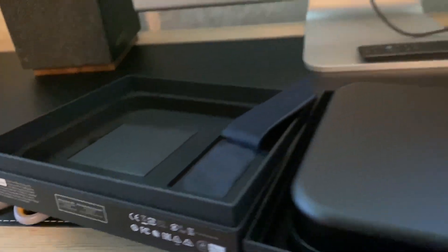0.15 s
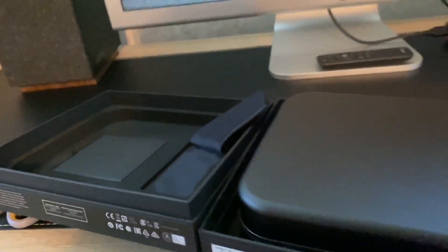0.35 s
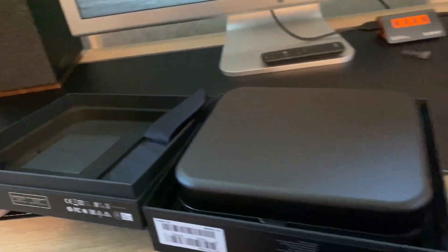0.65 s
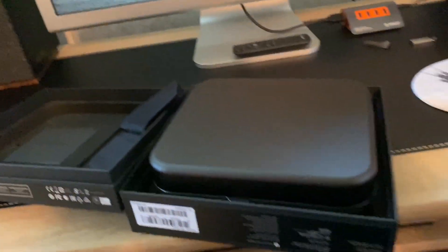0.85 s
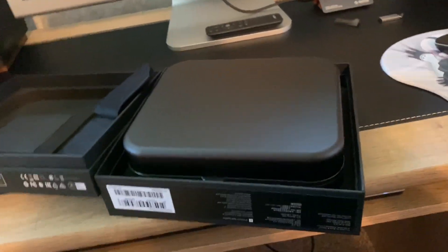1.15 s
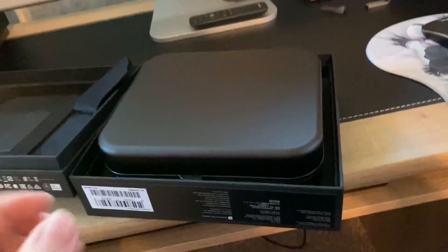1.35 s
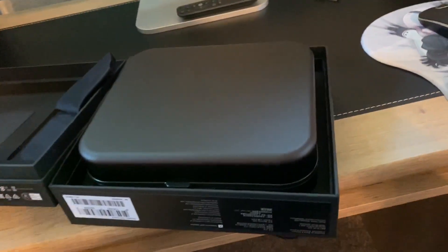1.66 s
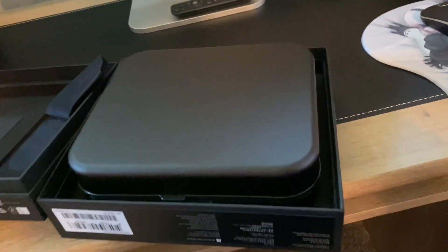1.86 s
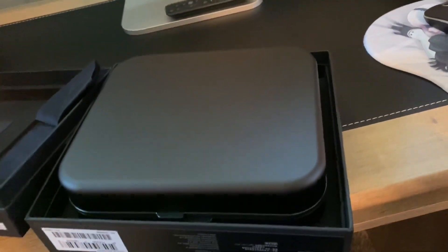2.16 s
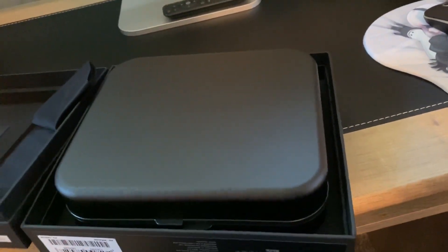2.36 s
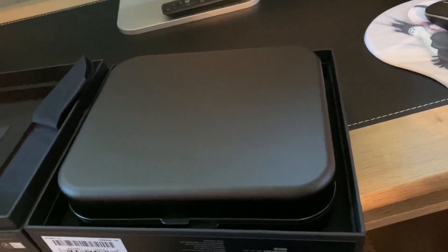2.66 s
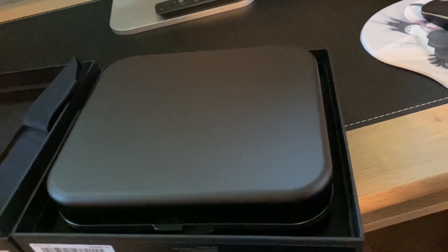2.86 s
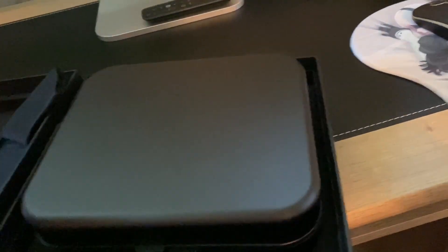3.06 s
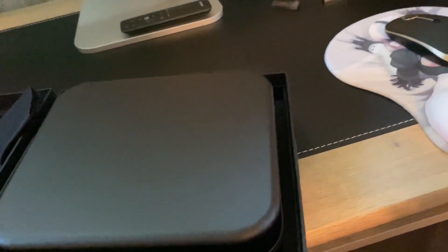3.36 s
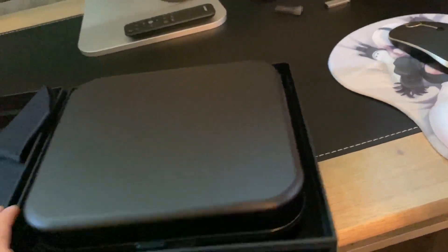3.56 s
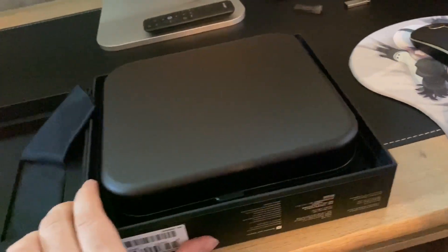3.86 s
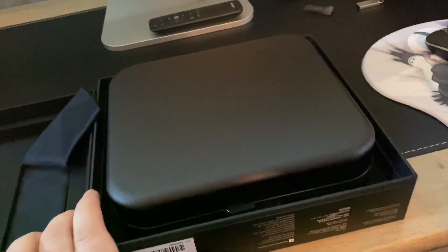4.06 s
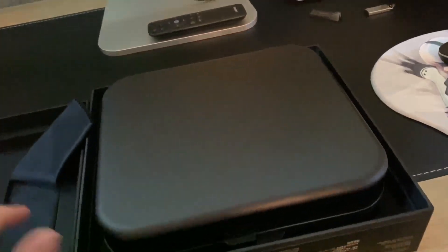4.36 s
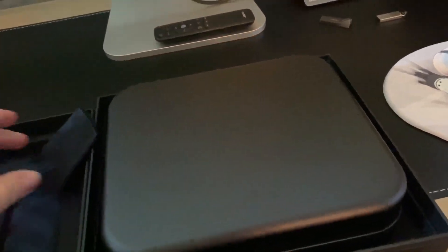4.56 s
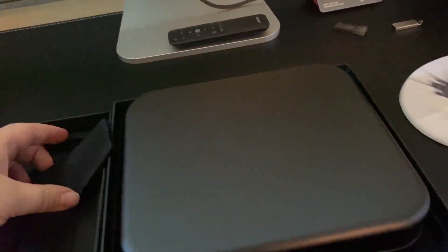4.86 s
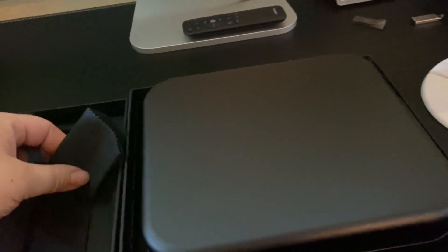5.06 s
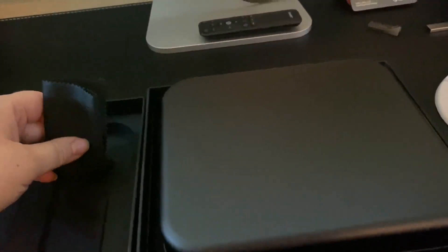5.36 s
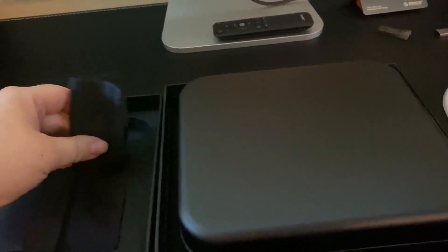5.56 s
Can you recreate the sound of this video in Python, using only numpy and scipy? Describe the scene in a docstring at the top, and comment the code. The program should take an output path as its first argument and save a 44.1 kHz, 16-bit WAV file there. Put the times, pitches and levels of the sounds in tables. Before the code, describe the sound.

Heard very near, with a short dull room tail: first only low humming air, then a small catch and bump at about one second. Cardboard rasps dryly with ticking edges and drops with a muffled knock, bumps softly again, then scrapes briefly and lands hard on the desk in a rapid cluster. Light rustling of fingers on cloth closes the scene.

```python
"""A low ventilation rumble with a wavering hum is heard first: shaped steady noise plus narrow noise bands.
Then a stiff cardboard box is handled on a wooden desk in a quiet room, close to two small microphones.
Fingers, card and cloth slide with a fine rasp (noise through resonances), edges tick as they catch (short
cracks of noise), and the hollow box knocks on the desk (sines that die away). A short room tail follows."""
import sys
import numpy as np
from scipy import signal
from scipy.fft import rfft, irfft, next_fast_len
from scipy.io import wavfile

SR = 44100
rng = np.random.default_rng(int(sys.argv[2]) if len(sys.argv) > 2 else 0)


def master(y):
    """Save y as 16-bit WAV."""
    cut = np.clip(np.atleast_2d(y).T, -1, 1)
    pcm = np.round(cut * 32767)  # scale
    wavfile.write(sys.argv[1], SR, pcm.astype(np.int16))


N = 252235  # length in samples

# Steady room noise, low part and high part: pitch_hz, level_db (per Hz)
RUMBLE_SPECTRUM = [(20, -103), (38, -83.5), (55, -64.5), (100, -69.5), (135, -72), (165, -76.5),
                   (230, -77.5), (300, -84.5), (520, -91.5), (800, -99), (1150, -101.5)]
AIR_SPECTRUM = [(1300, -106), (2000, -112), (3300, -117), (4300, -122.5), (6500, -126), (8500, -126),
                (10500, -131), (13500, -135), (16000, -148)]
# Wavering tones of the room: pitch_hz, width_hz, level_db (rms, before any drift)
HUM_TONES = [(70, 25, -53), (116.64, 3.36, -53), (448.4, 104, -64), (717, 34, -74.5), (867, 320, -69.5)]
DRIFT_DB, DRIFT_PER_S = 1.2, 1.5   # the upper tones swell and sink
UPPER_TONES_FROM_HZ = 202

# Four groups of resonances that colour a slide: pitch_hz, width_hz, level_db (within the group)
RASP_PEAKS = [(2630, 260, -9.5), (3035, 410, -7.5), (4160, 2100, -9)]        # edges and gaps
BODY_PEAKS = [(1120, 920, 9), (2010, 840, 5.5)]        # card panels under the slide
SCRATCH_PEAKS = [(4640, 3200, 5), (6760, 880, 5), (7630, 1180, 6)]  # corners and nails
HISS_PEAKS = [(8550, 2100, -5.5), (10730, 4750, 7), (12500, 7700, 6), (15100, 1700, -1.5)]        # surface grain
# Two long slides of card on card, each a list of points along a curve:
# time_s, rasp_db, then relative to the rasp: body_db, scratch_db, hiss_db
LONG_SLIDES = [
    [(1.5, -104, 15, -10, -15), (1.61, -80.5, 10.5, -14, -22), (1.684, -74, 8.5, -3.5, 5.5),
     (1.836, -73, 1, 1.5, 8), (1.92, -68.5, -6, 6, 14), (2.05, -70, 0, 1, 6.5), (2.15, -74, 5, -2, 8),
     (2.226, -69, -0.5, -3, 11), (2.33, -71, 0, -1.5, 9.5), (2.45, -66.5, -1, -4.5, 0.5),
     (2.51, -65, 1.5, -1, 4), (2.59, -75, -8, 6.5, 11.5), (2.74, -77.5, 1, 8, 5), (2.81, -95, 8, -15, -12)],
    [(3.342, -83, -2, 1, 1), (3.35, -63.5, 1, -2.5, -6.5), (3.526, -59, -1, -2, -4.5),
     (3.782, -63.5, 1, 4.5, 2.5), (3.81, -57.5, 6.5, -1, 1)],
]
# Short rubs of finger, card or cloth, and the shiver after a knock:
# start_s, rise_s, hold_s, rasp_db, then relative to the rasp: body_db, scratch_db, hiss_db
RUBS = [(.315, 0.009, .045, -100, -9, 19.5, 2), (1.054, 0.0025, 0.029, -63.5, 5, -8, -26),
        (1.097, 0.0044, 0.0017, -67.5, 11.5, -9, 2), (1.12, 0.0048, 0.012, -78, -4, -9, 4),
        (1.217, .003, 0.039, -84, -5, -3, -2), (2.515, 0.0013, 0.00099, -63, 12, 7.5, -5),
        (2.833, 0.0016, 0.012, -78, 10, 4, -32), (3.238, 0.037, 0.016, -74.5, 4, 6.5, 15),
        (3.275, 0.0089, 0.019, -67.5, -12, 6.5, -5), (3.805, 0.0068, 0.025, -47, 1, -5, -3.5),
        (3.95, 0.003, 0.051, -75, 2.5, -19, -30), (4.003, 0.0036, 0.057, -74, -4, -2.5, -7.5),
        (4.087, 0.024, 0.0066, -77, 4, -6, 7), (4.183, 0.014, .002, -80, 2, 1, 4),
        (4.41, 0.032, 0.06, -86.5, -18, 1, 1), (4.618, 0.028, 0.036, -74, -10, -5.5, -0.5),
        (4.777, 0.007, 0.068, -63.5, -2.5, -1.5, -3), (4.9, 0.0041, 0.0064, -68.5, 5.5, -2, -5),
        (5.045, 0.011, 0.0016, -85.5, 13, 3, 6.5), (5.215, 0.018, 0.02, -70.5, -4.5, -3.5, 3.5),
        (5.68, 0.0053, .05, -72, 2.5, -5, -8)]
# How fast a rub dies away in rasp, body, scratch and hiss: fade (dB per second)
RUB_FADES_DB_PER_S = [280, 274, 310, 407]

# Scuffs and soft shoves, noise around one pitch: start_s, rise_s, hold_s, level_db, pitch_hz, width_hz
SCUFFS = [(1.055, 0.0025, .015, -56.5, 2550, 990), (1.6, 0.033, 0.17, -78, 4430, 590),
          (1.948, 0.0077, 0.02, -55.5, 600, 585), (3.665, 0.016, 0.042, -52, 370, 376),
          (2.324, 0.026, 0.12, -69, 3270, 590), (3.998, 0.0041, 0.011, -68, 2320, 590),
          (4.083, 0.012, 0.026, -69, 4470, 1200), (4.08, 0.02, 0.025, -73.5, 7100, 800),
          (4.178, 0.011, 0.015, -80, 6900, 590), (4.182, .008, .02, -78, 4600, 900),
          (4.408, 0.033, .04, -81, 3680, 900), (4.63, .012, 0.042, -78, 2900, 600),
          (4.78, .005, 0.079, -73, 2200, 1500), (5.223, 0.0027, 0.026, -65.5, 4000, 2000),
          (5.291, 0.014, 0.018, -82, 4700, 900)]
SCUFF_FADE_DB_PER_S = 395

# Edges catching: start_s, level_db (peak), pitch_hz (main ring), treble_db (relative to ring), fade_ms
TICKS = [(1.1000, -37, 4900, -6, 0.61), (1.1101, -32.5, 3500, -27, 0.97), (1.1263, -41, 2300, -14, 0.87),
         (1.133, -48, 2780, 6, 0.94), (1.217, -57.5, 2750, -25, 2.5), (2.025, -52, 3500, -6, 2.5),
         (2.0556, -43, 2540, 2.5, 2.1), (2.507, -43, 6800, -9, 1.5), (2.512, -40.5, 3670, 3, 2),
         (2.5171, -31.5, 3150, -2, 1.8), (2.834, -46.5, 3060, -30, 2.6), (2.873, -59, 3130, -22, 3),
         (3.2735, -60, 2580, 12, 1.5), (3.3166, -29, 5440, -3, 0.91), (3.352, -41.5, 2440, -12, 2.3),
         (3.449, -42, 9000, -3, 1.0), (3.454, -46, 9900, 1, 1.0), (3.7938, -46, 7670, 2, 1.1),
         (3.8159, -36.5, 4340, 3.5, 5.2), (4.267, -66, 9000, 5, .6), (4.777, -47.5, 4500, 5, 1.5),
         (4.845, -50, 4500, 0, 1.3), (4.905, -65, 2400, -8, 1.2), (4.927, -49.5, 5670, -8, 1.6),
         (5.055, -68, 2600, -3, 1.2), (5.072, -76, 2600, -3, 1.2), (5.216, -59.5, 3000, -12, 1.5),
         (5.229, -50, 4860, -15, 2.7)]
TICK_SCRATCH_DB = -18   # corner scratch in every catch, relative to its ring
# One edge stutters along the rim: start_s, level_db (peak)
STUTTER = [(2.33, -46), (2.351, -42), (2.364, -41.5), (2.3855, -35.5), (2.4066, -48), (2.432, -49),
           (2.444, -45), (2.449, -52), (2.457, -49), (2.463, -46), (2.49, -48)]
# The rings shared by all its ticks: pitch_hz, width_hz, level_db (relative)
STUTTER_RINGS = [(3260, 320, 8), (5270, 530, -0.5), (6900, 1100, -2), (10900, 1500, 3)]
STUTTER_FADE_MS = 2.5

# Modes (natural tones) of box and desk: pitch_hz, level_db (relative), t60_s (time to fall 60 dB,
# before the hand's limit), lean (right -1 to left 1, before the ports)
BOX_MODES = [(87, 4.5, 0.028, -.1), (138.3, 6, 0.045, -0.026), (177.3, 0, 0.043, -0.12),
             (242.3, -0.5, 0.054, -0.28), (333, 1.5, 0.02, -0.2), (422, 0.5, 0.032, -0.22),
             (464.7, 1.5, 0.032, 0.27), (507.5, 1.5, 0.024, -0.074), (634, -5.5, 0.04, 0.13),
             (708, -8, 0.034, 0.097), (837, -1, 0.015, -0.11), (957, -5.5, 0.026, -0.2),
             (980, 1.5, 0.012, -0.075), (1225, -3, 0.0074, -0.11), (1520, -16, 0.037, .1)]
# Bumps and bounces, several in quick succession within one blow: start_s, level_db (peak),
# hardness_hz (of the contact)
BUMPS = [(1.1005, -36.5, 870), (1.114, -32, 99), (1.133, -33, 79), (2.521, -25.5, 324),
         (2.5235, -24.5, 885), (2.529, -25, 335), (2.5315, -19, 236), (2.538, -32, 795),
         (2.543, -24.5, 300), (2.5485, -24.5, 413), (2.559, -29.5, 241), (2.5595, -35, 900),
         (2.846, -31.5, 269), (2.857, -37, 287), (2.891, -43, 268), (3.8285, -24.5, 446),
         (3.8365, -25, 450), (3.838, -32, 900), (3.842, -22.5, 276), (3.857, -15, 460), (3.861, -17, 201),
         (3.94, -37.5, 173), (3.879, -21, 231)]
# The box lands corner first, its face follows: start_s, corner_db (peak), face_db (peak), hardness_hz (corner)
LANDINGS = [(1.1111, -33, -49, 716), (2.5182, -26.5, -32, 1220), (2.834, -41, -35.5, 680),
            (3.8278, -14.5, -26.5, 1160), (3.851, -29, -21.5, 790)]
FACE_LAG_S, FACE_HARDNESS = 0.00439, 0.46   # hardness as a part of the corner's
MODE_DETUNE = .03    # each mode's pitch varies a little by chance at every contact
HELD_T60_S = .045    # the hand on the box lets no mode ring longer

ROOM_T60_S, ROOM_DB = 0.21, -16
ROOM_LOW_HZ, WALL_CUT_HZ = 202, 3400   # the small room returns little bass, its walls dull the treble

# The two microphone ports: pitch_hz, likeness (0 to 1), tilt_db (left over right), lead (of right, radians)
PORTS = [(39.2, 1, -0.5, 0.3), (290, 0.83, -3.5, -.5), (663, 0.56, 2.5, -1.88), (1020, 1, 0, -1.3),
         (1730, 0, -4, -2), (3370, 0, -0.5, -0.5), (4900, 0.47, 3.5, -1.15), (6540, 0.46, 1, -0.48),
         (8470, 0.71, -2.5, 3.5), (10900, .99, 2, 6.5), (13500, .99, -2.5, 9), (16200, .95, 10, 13.5)]
LOW_CUT_HZ, CUTOFF_HZ = 56.2, 16300


def from_db(db):
    """Gain of a level in dB."""
    return 10 ** (np.asarray(db) / 20)


def rms_one(x):
    """Scaled to rms 1 (an average strength of 1)."""
    return x / np.sqrt(np.mean(x ** 2) + 1e-20)


def resonate(x, hz, width_hz):
    """Two-pole resonance: lets through the sound around one pitch, with a gain of about 1 there."""
    r = np.exp(-np.pi * width_hz / SR)
    top = (1 - r * r) / 2
    return signal.lfilter([top, 0, -top], [1, -2 * r * np.cos(2 * np.pi * hz / SR), r * r], x)


def bank(x, peaks):
    """Resonances side by side, each filtered twice, with alternating signs; rms 1."""
    total = 0
    for k, (hz, width_hz, db) in enumerate(peaks):
        ring = resonate(resonate(x, hz, width_hz), hz, 2 * width_hz)
        total = total + (-1) ** k * from_db(db) * ring
    return rms_one(total)


def flicker(rate):
    """Random wander around zero, rms 1, mostly slower than the rate in Hz."""
    r = np.exp(-2 * np.pi * rate / SR)
    noise = rng.standard_normal(N + SR)
    return rms_one(signal.lfilter([1], [1, -2 * r, r * r], noise)[SR:])   # skip the filter's first second


def swell(since, rise_s, hold_s, fade_db_per_s):
    """Rise, hold, then a steady fall in dB; one row for each fade rate."""
    rise = np.clip(since / rise_s, 0, 1) ** 2
    fading_s = np.maximum(since - rise_s - hold_s, 0)
    return rise * from_db(-np.outer(fade_db_per_s, fading_s))


def rumble():
    """Ventilation: noise mostly falling with pitch, and narrow noise bands heard as wavering tones."""
    hz = np.maximum(np.arange(N // 2 + 1) * SR / N, 1)
    points = np.array(RUMBLE_SPECTRUM + AIR_SPECTRUM)
    colour = from_db(np.interp(np.log(hz), np.log(points[:, 0]), points[:, 1]))
    out = np.sqrt(SR / 2) * irfft(rfft(rng.standard_normal((2, N))) * colour, N)
    for tone_hz, width_hz, db in HUM_TONES:
        drift_db = DRIFT_DB * (tone_hz > UPPER_TONES_FROM_HZ) * flicker(DRIFT_PER_S)
        tone = bank(rng.standard_normal((2, N + SR)), [(tone_hz, width_hz, 0)])[:, SR:]
        out += from_db(db + drift_db) * tone
    return out


def strokes():
    """Gains in time of rasp, body, scratch and hiss: slides follow curves, rubs swell; powers add."""
    t, power = np.arange(N) / SR, np.zeros((4, N))
    for rows in LONG_SLIDES:
        s, rasp_db, *shares_db = np.transpose(rows)
        for k, share_db in enumerate([0, *shares_db]):
            level_db = np.interp(t, s, rasp_db + share_db, left=-np.inf, right=-np.inf)
            power[k] += from_db(level_db) ** 2
    for s, rise_s, hold_s, db, *shares_db in RUBS:
        start = round(s * SR)
        at = slice(start, start + SR // 2)
        gains = from_db(db + np.c_[[0, *shares_db]])
        power[:, at] += (gains * swell(t[at] - s, rise_s, hold_s, RUB_FADES_DB_PER_S)) ** 2
    return np.sqrt(power)


def shifting(x, peaks, patchy_db=1.5, rate=7.0):
    """Resonances that each wax and wane as the grip moves over the card; rms 1."""
    total = 0
    for k, (hz, width_hz, db) in enumerate(peaks):
        gain = from_db(db + patchy_db * flicker(rate))
        total = total + gain * bank(x, [(hz, width_hz, 0)]) * (-1) ** k
    return rms_one(total)


def slide(grain_db=2.2, clump_db=1.2, uneven_db=0.8):
    """Fibres catch and let go thousands of times a second; four groups of resonances colour them."""
    grain = np.minimum(rng.exponential(1, (2, N)), 5)
    strength_db = grain_db * grain + clump_db * flicker(103) + uneven_db * flicker(16)
    fibres = rng.standard_normal((2, N)) * from_db(strength_db)
    groups = (RASP_PEAKS, BODY_PEAKS, SCRATCH_PEAKS, HISS_PEAKS)
    return sum(gain * shifting(fibres, peaks) for gain, peaks in zip(strokes(), groups))


def scuffs(length=SR // 4):
    """Scuffs and soft shoves: short swells of noise around one pitch."""
    out = np.zeros((2, N + length))
    noises = rng.standard_normal((len(SCUFFS), 2, length))
    for (s, rise_s, hold_s, db, hz, width_hz), noise in zip(SCUFFS, noises):
        shape = swell(np.arange(length) / SR, rise_s, hold_s, SCUFF_FADE_DB_PER_S)
        start = round(s * SR)
        out[:, start:start + length] += from_db(db) * shape * bank(noise, [(hz, width_hz, 0)])
    return out[:, :N]


def ticks(sharp=1400, length=1500):
    """An edge catches: a fast-fading crack of noise rings, more broadly if short, with scratch and treble."""
    out, ms = np.zeros((2, N + length)), np.arange(length) * 1000 / SR
    noises = rng.standard_normal((len(TICKS), 2, length))
    for (s, db, hz, treble_db, fade_ms), noise in zip(TICKS, noises):
        crack = noise * np.exp(-ms / fade_ms)
        ring = resonate(crack, hz, sharp / fade_ms)
        parts = ring, bank(crack, SCRATCH_PEAKS), bank(crack, HISS_PEAKS)
        shares_db = 0, TICK_SCRATCH_DB, treble_db
        tick = sum(from_db(share_db) * p / np.abs(p).max() for share_db, p in zip(shares_db, parts))
        start = round(s * SR)
        out[:, start:start + length] += from_db(db) * tick
    for (s, db), noise in zip(STUTTER, rng.standard_normal((len(STUTTER), 2, length))):
        tick = bank(noise * np.exp(-ms / STUTTER_FADE_MS), STUTTER_RINGS)
        start = round(s * SR)
        out[:, start:start + length] += from_db(db) * tick / np.abs(tick).max()
    return out[:, :N]


def knocks(rise_cycles=0.068, length=SR // 4):
    """A contact pushes hardest on modes near its hardness; low modes rise more slowly; each contact varies."""
    hz, db, t60, lean = np.transpose(BOX_MODES)[:, :, None]
    t, out = np.arange(length) / SR, np.zeros((2, N + length))
    decay = from_db(db - 60 * t / np.minimum(t60, HELD_T60_S))
    shapes = decay * (1 - np.exp(-t * hz / rise_cycles)) ** 2
    count = len(BOX_MODES)
    # neighbouring modes move in opposition; the second row leans each mode to one side
    signs = (-1.) ** np.arange(count) * np.array([np.ones(count), lean[:, 0]])
    contacts = BUMPS + [(s, corner_db, hard_hz) for s, corner_db, _, hard_hz in LANDINGS]
    contacts += [(s + FACE_LAG_S, face_db, FACE_HARDNESS * hard_hz) for s, _, face_db, hard_hz in LANDINGS]
    chances = rng.standard_normal((len(contacts), 2, count, 1))
    for (s, peak_db, hard_hz), (luck, shift) in zip(contacts, chances):
        push = (hz / hard_hz) ** 2.5 / (1 + (hz / hard_hz) ** 6) * from_db(1.5 * luck)
        tones = np.sin(2 * np.pi * hz * (1 + MODE_DETUNE * shift) * t)
        knock = signs @ (push * shapes * tones)
        start = round(s * SR)
        out[:, start:start + length] += from_db(peak_db) * knock / np.abs(knock[0]).max()
    return out[:, :N]


def room(x, gap_s=0.005):
    """Echoes blur into two unrelated decaying noise tails, thin in bass and dulled by the walls."""
    t = np.arange(SR // 2) / SR
    tails = rng.standard_normal((2, len(t))) * from_db(-60 * t / ROOM_T60_S) * (t > gap_s)
    band = signal.butter(1, [ROOM_LOW_HZ, WALL_CUT_HZ], "band", fs=SR, output="sos")
    tails = signal.sosfilt(band, tails)
    tails = tails / np.sqrt((tails ** 2).sum(axis=1, keepdims=True))
    return signal.fftconvolve(x[None], tails, axes=1)[:, :N]


def ports(shared, apart):
    """A shared part and a part that differs between left and right; the right port leads in the treble."""
    size = next_fast_len(N + 2048)
    hz, table = np.arange(size // 2 + 1) * SR / size, np.array(PORTS)
    alike, tilt_db, lead = (np.interp(hz, table[:, 0], column) for column in table.T[1:])
    alike, side = np.clip(alike, 0, 1), np.array([[1], [-1]])   # side: left 1, right -1
    common = np.sqrt((1 + alike) / 2) * rfft(shared, size)
    opposed = side * np.sqrt((1 - alike) / 2) * rfft(apart, size)
    tilt = from_db(side * tilt_db / 2) * np.exp(-.5j * side * lead)
    return irfft((common + opposed) * tilt, size)[:, :N]


def scene():
    """Near sources with their room tail, over the rumble, heard through the two ports."""
    near = slide() + ticks() + knocks() + scuffs()
    tail = from_db(ROOM_DB) * room(near[0])
    shared, apart = near + tail + rumble()   # apart: the part that differs between left and right
    return ports(shared, apart)


def record(dry):
    """The deepest bass is rolled off and the top is cut steeply."""
    high_pass = signal.butter(3, LOW_CUT_HZ, "high", fs=SR, output="sos")
    thin = signal.sosfilt(high_pass, dry)
    low_pass = signal.cheby2(14, 60, CUTOFF_HZ, fs=SR, output="sos")   # 60 dB down from the cutoff up
    return signal.sosfilt(low_pass, thin)


dry = scene()
out = record(dry)
master(out)
```